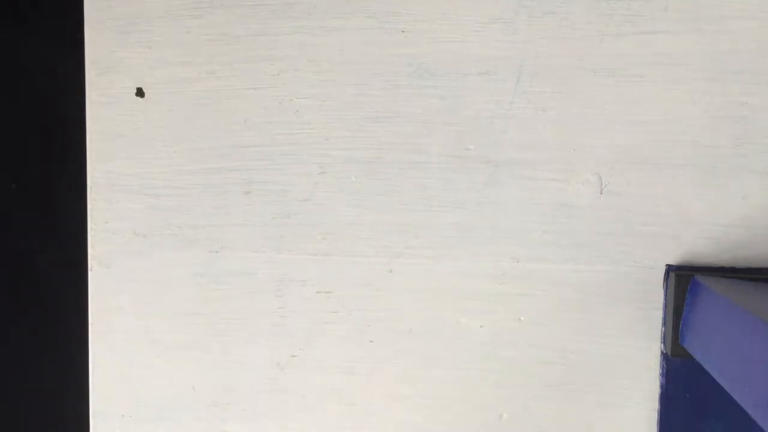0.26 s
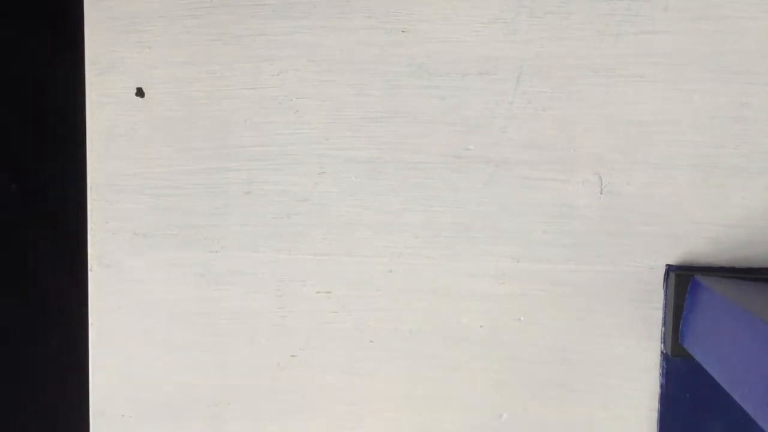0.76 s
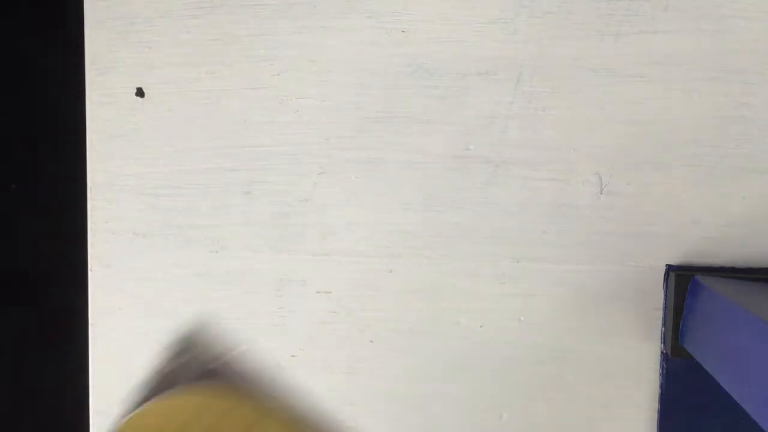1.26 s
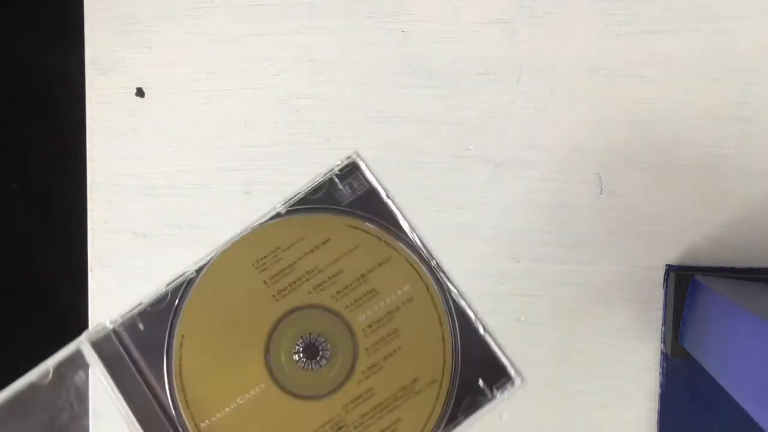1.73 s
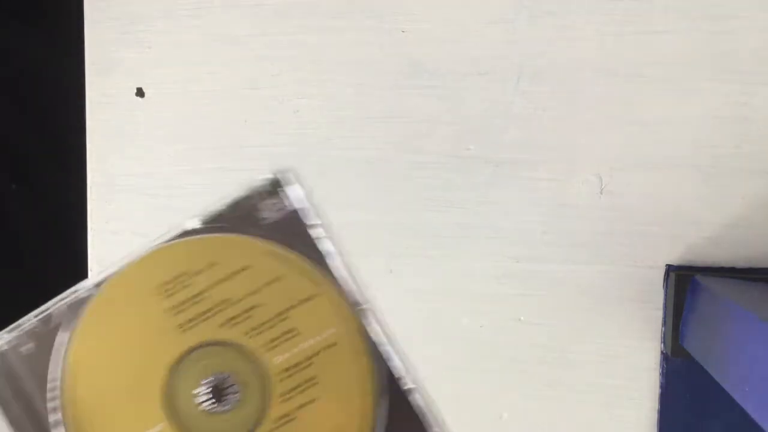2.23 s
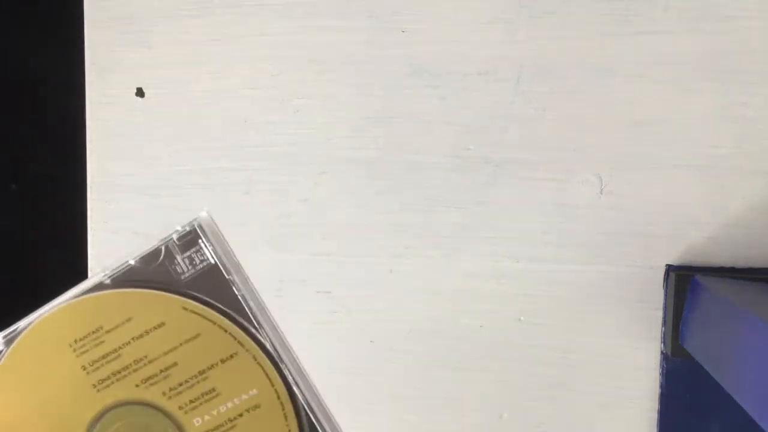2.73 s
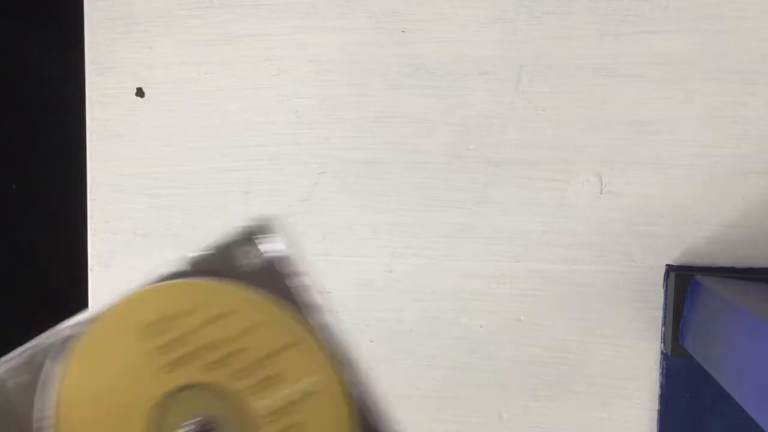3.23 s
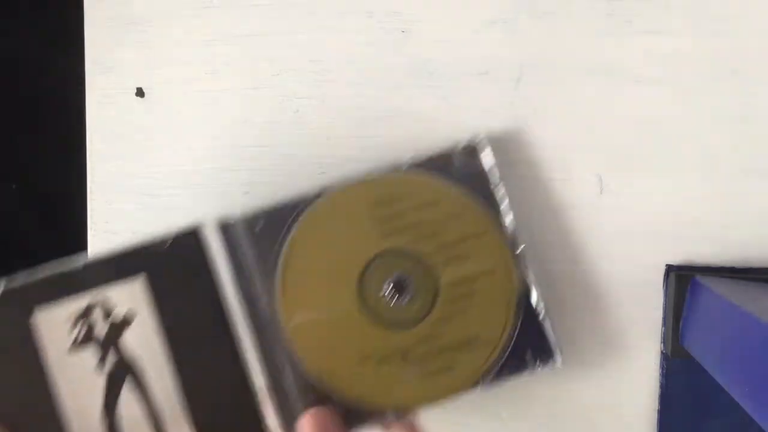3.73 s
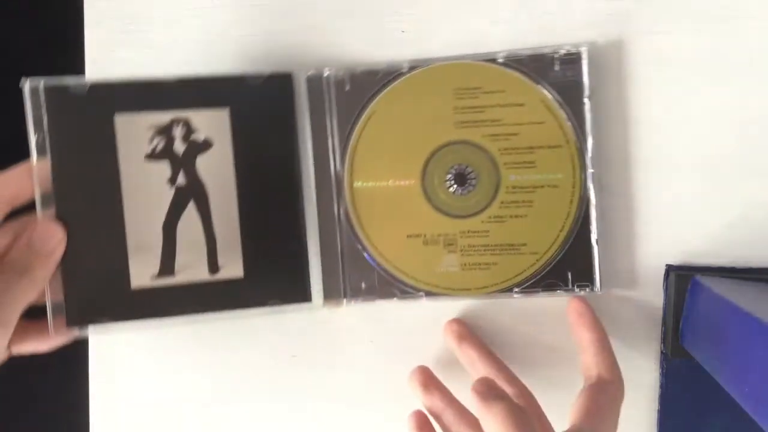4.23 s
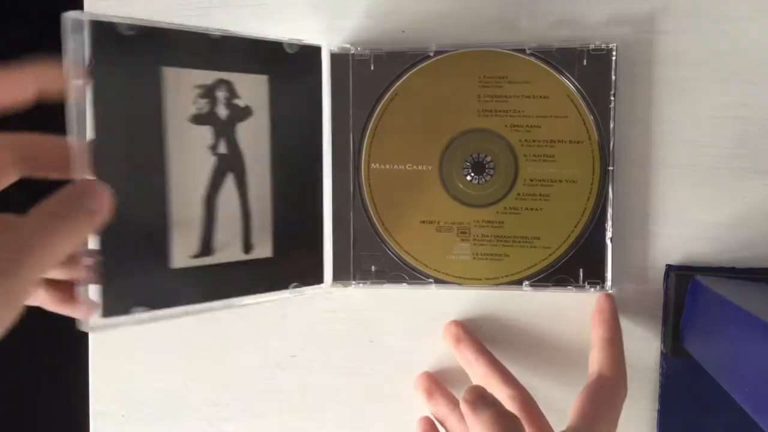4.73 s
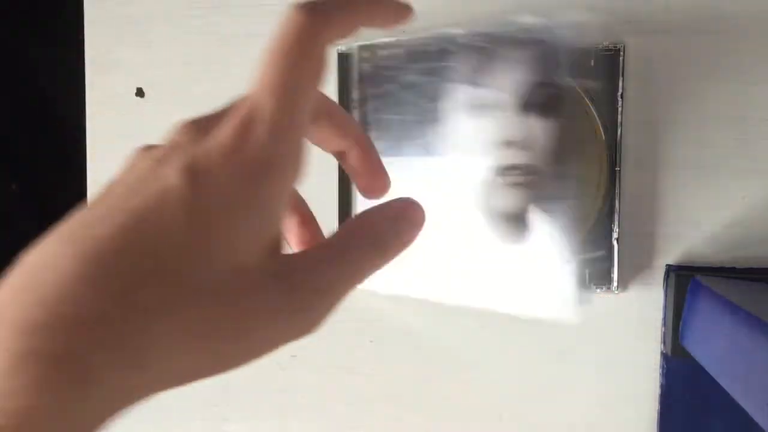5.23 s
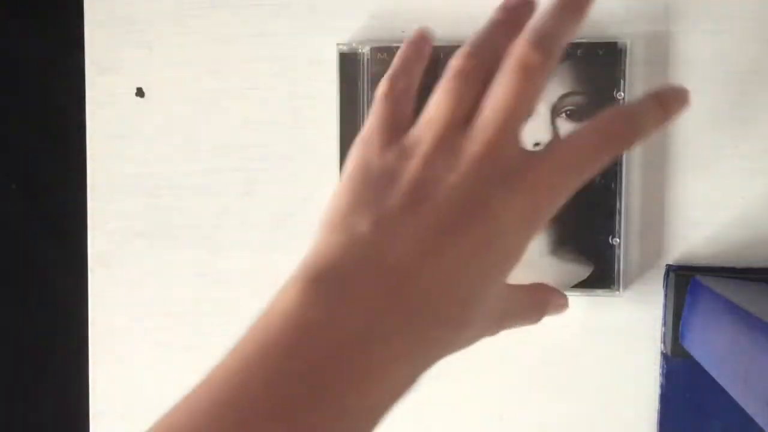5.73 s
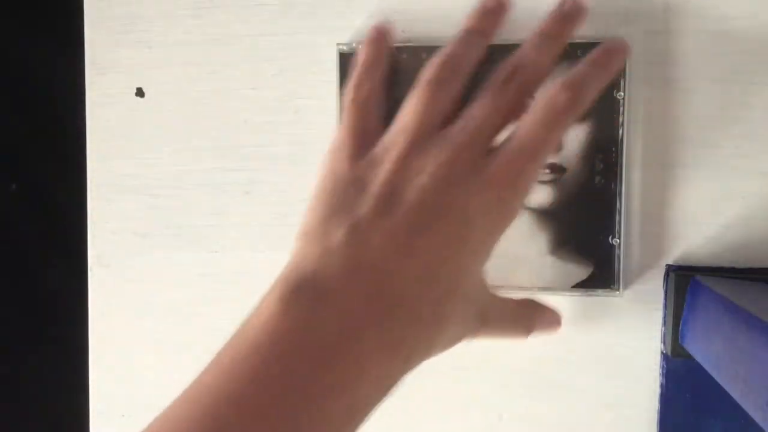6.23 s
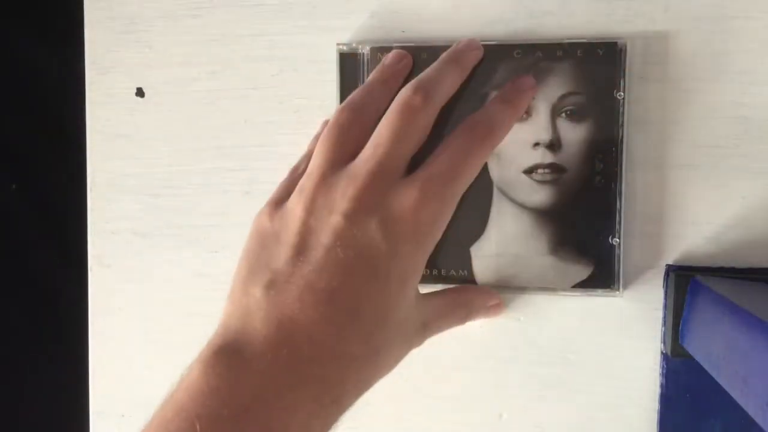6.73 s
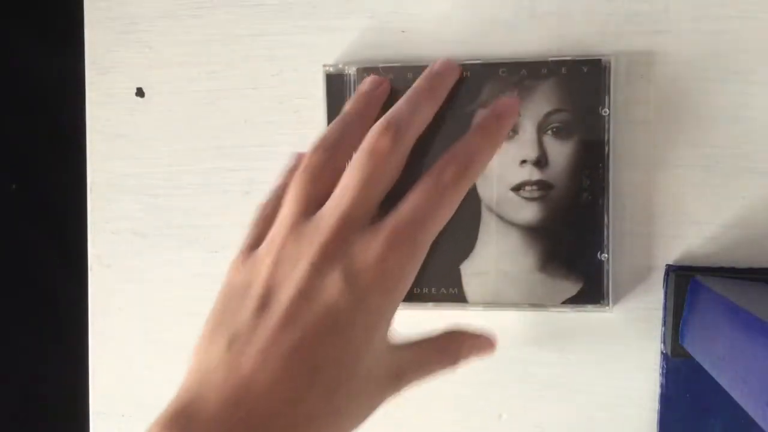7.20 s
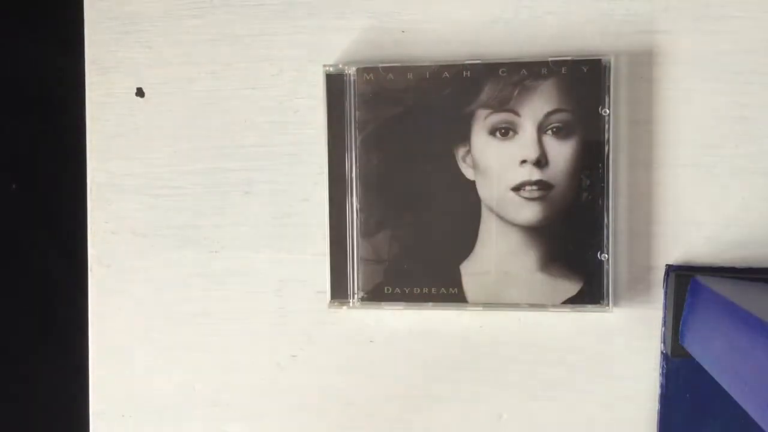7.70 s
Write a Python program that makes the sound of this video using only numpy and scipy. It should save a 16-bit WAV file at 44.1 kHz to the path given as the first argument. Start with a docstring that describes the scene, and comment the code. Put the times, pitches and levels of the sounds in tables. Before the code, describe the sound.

Bright, brittle plastic ticks come in uneven bursts, with short rustling strokes of paper and fingers. A hard case lands on a table with a clatter and scrapes, then pauses before a crisp sharp snap closes it. Only faint touches remain. Behind it, through the walls, a low engine note climbs and falls in traffic rumble, and a soft low hum ends it. Close microphone, light hiss, short room tail.

```python
"""Handling a plastic disc case

Hands turn an open case, slide its paper booklet in, set it down on a table, push it along and snap it shut.
Knocks (short forces) and rubbing (strings of micro-contacts) excite the same case and table modes in a small room.
Outside, an engine revs as a harmonic series amid traffic, which is shaped noise; a low steady tone follows
near the end. A faint whistle of narrow-band noise and the microphone's hiss complete the scene."""
import sys
import numpy as np
from scipy import signal
from scipy.io import wavfile

SR = 44100
rng = np.random.default_rng(int(sys.argv[2]) if len(sys.argv) > 2 else 0)


def inscribe(sig):
    """Save sig as 16-bit PCM at rate SR to the path in sys.argv[1].

    A 1-D sig is mono; a 2-D sig holds one channel per row.
    Samples are clipped to [-1, 1] before scaling.
    """
    pcm = np.round(np.clip(np.atleast_2d(sig).T, -1, 1) * 32767)
    wavfile.write(sys.argv[1], SR, pcm.astype(np.int16))


N = 351036

LANDS_S, LAID_DOWN_S, SHUT_S = 3.7, 4.08, 5.3   # the case meets the table, lies flat, is shut
IN_HAND_HZ, ON_TABLE_HZ = 1000, 1400   # the lowest free case mode rises once the case lies flat
TABLE, LOWER, MIDDLE, UPPER = range(4)   # registers of the body


def amp(db):
    """Decibel law: 20 dB is a factor of ten in amplitude."""
    return 10 ** (np.asarray(db) / 20)


def rms_one(x):
    """Normalisation to unit root-mean-square."""
    return x / np.sqrt(np.mean(x ** 2) + 1e-20)


def in_time(rows):
    """Linear interpolation of each column along the time in the first."""
    s, *columns = np.transpose(rows)
    return [np.interp(np.arange(N) / SR, s, column) for column in columns]


def while_on(rows, fade_s=0.55):
    """Linear gating: fades centred on the first and last rows."""
    t = np.arange(N) / SR
    return np.clip(np.minimum(t - rows[0][0], rows[-1][0] - t) / fade_s + .5, 0, 1)


def drift(rate_hz):
    """Low-passed chance, two poles at the given rate; spread 1."""
    r = np.exp(-80 * np.pi * rate_hz / SR)   # one value per 40 samples
    slow = signal.lfilter([1], [1, -2 * r, r * r], rng.standard_normal(N // 40 + 2002))[2000:]
    return np.interp(np.arange(N) / 40, np.arange(len(slow)), rms_one(slow))


def resonate(x, hz, width_hz):
    """Damped resonance of one mode; white noise of rms 1 comes out at rms 1."""
    r = np.exp(-np.pi * width_hz / SR)
    b = np.sqrt((1 - r * r) / 2)
    return signal.lfilter([b, 0, -b], [1, -2 * r * np.cos(2 * np.pi * hz / SR), r * r], x)


def band(x, low_hz, high_hz):
    """Band-pass filtering; white noise of rms 1 comes out near rms 1."""
    sos = signal.butter(2, [low_hz, high_hz], "band", fs=SR, output="sos")
    return signal.sosfilt(sos, x) * np.sqrt(SR / 2 / (high_hz - low_hz))


def coloured(spectrum, patchy_db):
    """Spectral shaping by bands of about half an octave, each flickering a little; rms 1."""
    hz, level_db = np.transpose(spectrum)
    out, white = 0, rng.standard_normal((2, N))
    edges = np.geomspace(hz[0], hz[-1], int(2.5 * np.log2(hz[-1] / hz[0])))
    for k, (low, high) in enumerate(zip(edges, edges[1:])):
        per_hz_db = np.interp(np.log(low * high) / 2, np.log(hz), level_db)
        level = amp(per_hz_db + patchy_db * drift(5.7)) * np.sqrt(high - low)
        out = out + level * band(white[k % 2], low, high)
    return rms_one(out)


# modes of the table (below 600 Hz) and the case: mode_hz, width_hz, open_db, shut_db (relative levels)
MODES_OF_CASE = [(160, 39, -3, 2.5), (253, 37, 3.5, -3.5), (287.6, 31, 5.5, 2), (402, 32, -3.5, -7),
                 (1004, 80, -2.5, -8), (1220, 80, -7, -2.5), (1355, 76, -2, 1), (1752, 200, 3.5, -4),
                 (1920, 100, -0.5, -1), (2110, 100, 1, 4), (2454, 140, 1, -4), (2737, 120, -6.5, 2),
                 (2925, 90, -5.5, 0), (3170, 90, -5, -6), (3500, 120, 3.5, -0.5), (4363, 160, 3.5, -0.5),
                 (5050, 280, -5.5, 0), (5700, 750, 0.5, 0.5), (6540, 530, -2, 0.5), (6930, 220, -5.5, -1),
                 (8270, 300, -2, 1.5)]
# registers of the body: low_hz, high_hz, broad_db (relative level of the sound between the modes)
REGISTERS = [(110.8, 410, -4), (633, 1850, -3.5), (1753.3, 5200, -2.5), (5040, 12000, 0.5)]
RUB_BETWEEN_MODES_DB = -5   # rubbing speaks mostly through the modes


def case():
    """Modal superposition: knocks and friction drive each mode with a strength of its own."""
    rub_levels, free_hz = rubbing()
    flat = np.arange(N) / SR >= LAID_DOWN_S
    shut = np.arange(N) / SR >= SHUT_S
    lowest_hz = np.where(flat, ON_TABLE_HZ, IN_HAND_HZ)
    friction, rattle = grit(2500, spread_db=3), grit(4000, spread_db=3)
    out, n = np.zeros(N), 0
    for k, (low, high, broad_db) in enumerate(REGISTERS):
        modes = [m for m in MODES_OF_CASE if low <= m[0] < high]
        register = 0
        for mode in modes + [None]:   # None is the broad sound between the modes
            force, chatter = knocks(k, mode, lowest_hz)
            if not mode:
                force = force * np.roll(rattle, 997 * n)

            if mode and k in (LOWER, MIDDLE):
                free = lowest_hz if k == LOWER else free_hz
                rub_db = grip(mode[0], free, 7 + 3 * flat - 5 * shut, flat)
            else:
                rub_db = 2 * shut
            flicker_db = 3.5 * drift(28) + (0 if mode else RUB_BETWEEN_MODES_DB)
            rub = rub_levels[k] * amp(flicker_db + rub_db)

            # shifted copies keep the grit of each mode its own
            push = force + (rub + chatter) * np.roll(friction, 1499 * n)
            if mode:
                mode_hz, width_hz, open_db, shut_db = mode
                push = push * amp(np.where(shut, shut_db, open_db))
                register += resonate(push, mode_hz, width_hz) / np.sqrt(len(modes))
            else:
                register += amp(broad_db) * band(push, low, high)
            n += 1
        sos = signal.butter(2, [low / 1.2, high * 1.2], "band", fs=SR, output="sos")
        out += signal.sosfilt(sos, register)
    return out


# knocks, ticks and the snap: start_s, level_db (1.8-5 kHz), then relative to it thump_db (table),
# lower_db (0.7-1.8 kHz), upper_db (above 5 kHz); contact_ms, free_hz (the freest-ringing pitch)
KNOCKS = [(0.071, -45.5, -31, -16, -7, 2.5, 3937), (0.429, -47, -7, -38, -1.5, 2.6, 2720),
          (0.486, -35.5, -5.5, -3, -7, 3.57, 4950), (0.856, -57, -20, -5, -1, 3.3, 2520),
          (0.969, -45.5, -13, -4, -2, 3, 2530), (1.0206, -36, -44, -37, -8.5, 1.9, 3080),
          (1.087, -41.5, -32, -31, 3.5, 4, 2860), (1.126, -39, -16, -7.5, -4.5, 11.2, 4750),
          (1.184, -43, -26, -11, -9.5, 10, 1760), (1.714, -57, -25, -24, 5.5, 9.9, 3800),
          (1.756, -59, -21, -18, 8, 19, 4520), (1.931, -44, -5, 0, -20, 6.1, 1910),
          (1.94, -30, -10.5, -11.5, -5.5, 7.3, 4220), (2.084, -33.5, -5, -5, -8, 3.26, 3990),
          (2.0918, -25, -8.5, -8.5, -9, 3.6, 4330), (2.096, -40.5, -22, 13.5, -24, 5.45, 1920),
          (2.026, -52, -25, -20, -8, 4, 4600), (2.286, -52, -16, 0, -11, 5, 3430),
          (2.557, -55, -18, 8, -10, 3, 1000), (2.704, -35.5, -26, -22, -7.5, 6, 2230),
          (2.717, -50.5, -2, 4, 2, 5.1, 2200), (2.802, -44.5, -10, 13, 9.5, 1.2, 1240),
          (2.969, -46.5, -23, -13, -6, 5, 3630), (3.028, -44, -12.5, -3.5, -22, 8.6, 3350),
          (3.048, -50, -11, 3, -20, 3.1, 3500), (3.464, -45, -21, -13, -18, 3.8, 4200),
          (3.495, -42.5, -26, 3, -36, 2.93, 1950), (3.711, -22, -9.5, -3, -11.5, 4.37, 3800),
          (3.786, -34, -7.5, -3, -14, 3.4, 2770), (4.044, -22.5, -8.5, -2, -6, 2.5, 2000),
          (4.058, -14.5, -12, -6, -10.5, 5.53, 2531), (4.063, -19.5, -5.5, -9, -14, 3.97, 3450),
          (4.987, -53.5, 10, -1, -32, 14, 2130), (5.335, -23, -13.5, -10.5, -8, 5, 2166),
          (5.3396, -11, -16.5, -12.5, 0, 7.04, 2110), (5.347, -18.5, -5, 1.5, -2.5, 5, 2804),
          (5.928, -56, 7.5, 3, -19, 7.6, 2075), (6.196, -59.5, -2, 7.5, -9.5, 4.3, 2184),
          (6.251, -56.5, -9, -16, -22, 6.8, 2150), (6.464, -51.5, -6, -5, -3.5, 3.7, 3050),
          (6.474, -54, 6, 1, -14, 3, 1220), (6.52, -57.5, 6, 11, -18, 3.2, 1002),
          (6.939, -51, -2, 1.5, -9, 4.1, 4510), (7.151, -52, -2, 5, -13.5, 2.58, 2160)]
RATTLE_MS, RATTLE_DB = 8.8, -14   # decay constant; level after a knock of -40 dB
THUD_IN_HAND_HZ, THUD_ON_TABLE_HZ = 180, 300   # the low thud rises once the case meets the table


def knocks(k, mode, lowest_hz):
    """Impulsive excitation: the forces on one mode, and the chatter of loose parts after each."""
    force, loose = np.zeros((2, N + SR))
    decay = amp(RATTLE_DB) * np.exp(-np.arange(SR // 20) / SR * 1000 / RATTLE_MS)
    for s, mid, thump, lower, upper, ms, free in KNOCKS:
        start = at = round(s * SR)
        shape = contact(ms)
        if mode:   # a mode takes the whole blow at one moment; the table answers late in the contact
            share = rng.uniform(.15, 1) if k != TABLE else .8
            shape = np.sqrt([np.sum(shape ** 2)])
            at = start + round(share * ms * SR / 1000)

        grip_db = 0
        if k == TABLE and mode:
            grip_db = grip(mode[0], THUD_IN_HAND_HZ if s < LANDS_S else THUD_ON_TABLE_HZ, 5)
        elif k in (LOWER, MIDDLE) and mode:   # a hard blow overcomes the grip and rings every mode
            ringing_hz = lowest_hz[at] if k == LOWER and free >= ON_TABLE_HZ else free
            grip_db = grip(mode[0], ringing_hz, -.2 * mid / (3 - k))
        elif k in (LOWER, MIDDLE):   # a light tick is mostly ring, a hard blow mostly clatter
            grip_db = .3 * mid + 6

        relative_db = [thump, lower, 0, upper][k]
        strength = amp(mid + relative_db + grip_db + 4 + 1.5 * rng.standard_normal())
        force[at:at + len(shape)] += shape * strength
        # light knocks chatter most for their strength
        loose[start:start + len(decay)] += decay * strength * amp(-.15 * (mid + 40))
    return force[:N], loose[:N]


def contact(ms):
    """Contact mechanics: the force builds as edges meet, then dies away."""
    t_ms = np.arange(int(.04 * SR)) / SR * 1000
    return (1 - np.exp(-t_ms / (0.47 * ms))) * np.exp(-(t_ms / ms) ** 2)


PARTNER_RATIO = 2.2   # lying flat, a free mode also frees a partner this far below it


def grip(hz, free_hz, depth_db, flat=0):
    """Selective damping: touch favours modes near the free pitch over the others."""
    free, partner = (np.exp(-(np.log2(hz * ratio / free_hz) / .21) ** 2) for ratio in (1, PARTNER_RATIO))
    return depth_db * (free + .8 * flat * partner - .5)


# strokes of fingers, paper and case: start_s, length_s, level_db (1.8-5 kHz), change_db (over the stroke),
# lower_db (0.7-1.8 kHz) and upper_db (above 5 kHz) relative to level_db, free_hz (the freest-ringing pitch)
STROKES = [(0.0, 0.59, -71, 1, -2, 2, 2390), (0.172, 0.066, -69.5, -1.5, -17, 8.5, 3800),
           (0.373, 0.023, -66, 3.5, 3.5, -4, 2100), (0.99, 1, -72, 5.5, -11, 1.5, 3040),
           (1.14, 0.071, -53.5, -12.5, -3.5, -1, 2520), (1.272, 0.064, -60.5, 0, -7, -1, 1730),
           (1.463, 0.055, -54, 0, -3, 2, 3500), (1.768, 0.029, -63, -6, -15, 6, 3320),
           (1.896, 0.016, -57, -7, -20, -6, 2300), (2.04, 0.026, -50, 2.5, -13, 3.5, 4220),
           (2.293, 0.13, -47, -6, -2.5, 1.5, 3400), (2.425, 0.13, -56.5, 8, -2, 3.5, 3900),
           (2.564, 0.13, -50.5, -13.5, -8, 4, 3870), (2.796, 0.15, -50.5, -12, -8, -1, 3660),
           (3.715, 0.18, -38.5, -9, -7.5, -5, 3470), (3.881, 0.3, -40, -9, -12, -4.5, 3520),
           (4.093, 0.25, -39.5, -10, -2.5, -7.5, 3200), (4.268, 0.26, -46.5, -9, -3.5, -8, 4290),
           (4.564, 0.83, -71.5, 3.5, -1, -7, 4850), (4.709, 0.034, -55.5, 4.5, -5, -10, 4500),
           (5.2, 0.055, -59.5, -1, 5.5, -9, 1889), (5.28, 0.049, -57, 6.5, 2.5, -7, 1930),
           (6.835, 0.028, -51, -5.5, -1, -10, 1940), (6.88, 0.047, -53, -2.5, 1, -9, 3300),
           (6.941, 0.041, -52.5, -8, -1.5, -11, 2100), (7.284, 0.19, -72.5, 1, -8, -9.5, 3000)]
PRESS_DB_PER_S, LIFT_DB_PER_S = 447, 348   # swell before the start for a -55 dB stroke; fall after the end


def rubbing():
    """Stick-slip friction: strokes set the rub level of each register and the free pitch."""
    t = np.arange(0, N, 64) / SR
    start, length, level, change, *colour = np.array(STROKES).T[:, :, None]
    run_db = level + change * np.clip((t - start) / length, 0, 1)
    press = PRESS_DB_PER_S * amp(0.35 * (level + 55))   # firmer strokes swell faster
    stroke_db = run_db - press * np.maximum(start - t, 0) - LIFT_DB_PER_S * np.maximum(t - start - length, 0)
    strongest = stroke_db.argmax(axis=0)   # the strongest stroke sets level and colour
    courses = [stroke_db.max(axis=0)] + [c[strongest, 0] for c in colour]
    mid_db, lower_db, upper_db, free_hz = [np.interp(np.arange(N) / SR, t, c) for c in courses]

    rasp_db = 1.8 * drift(40)   # the surfaces catch and let go
    table_db = lower_db - 7 - 5 * (np.arange(N) < LANDS_S * SR)   # the table hums along more once touched
    levels = amp(mid_db + rasp_db + [table_db, lower_db, 0 * mid_db, upper_db])
    levels[TABLE] += hinge()
    return levels, free_hz * 2 ** (.07 * drift(9))   # the grip keeps shifting


# groan of the swinging lid: start_s, level_db
HINGE = [(4.55, -63), (4.95, -65), (5.15, -50), (5.22, -52), (5.33, -62.5)]


def hinge():
    """Structure-borne friction: the level at which the swinging lid groans into the table."""
    return while_on(HINGE) * amp(in_time(HINGE)[0] + 2.5 * drift(15))


def grit(per_s, spread_db):
    """Poisson-like excitation: random micro-contacts of uneven size; rms 1."""
    sizes = amp(spread_db * np.minimum(rng.exponential(1, N), 4)) * rng.choice([-1, 1], N)
    return rms_one(sizes * (rng.random(N) < per_s / SR))


ROOM_T60_S, ROOM_DB, WALL_CUT_HZ = .135, -13, 13000


def room(x):
    """Diffuse reverberation: a dense tail of decaying noise after the first reflection."""
    t = np.arange(int(.4 * SR)) / SR
    tail = rng.standard_normal(len(t)) * amp(-60 * t / ROOM_T60_S) * (t > .004)
    tail = signal.sosfilt(signal.butter(1, WALL_CUT_HZ, fs=SR, output="sos"), tail)
    return amp(ROOM_DB) * signal.fftconvolve(x, tail / np.sqrt(np.sum(tail ** 2)))[:N]


# engine outside, speeding up, then easing off: start_s, firing_hz, level_db
ENGINE = [(.7, 47.67, -66), (1.55, 55.3, -63.5), (2.0, 60, -67), (2.5, 64.4, -67.5), (3.5, 75.36, -56),
          (3.95, 77.7, -43.5), (4.65, 81.85, -53.5), (5.1, 80.8, -49.5), (5.5, 80.3, -52.5),
          (5.8, 73.45, -51.5), (6.3, 64.7, -77)]
# relative level_db of orders 1, 2, 3 with the throttle open
PULLING_DB = [-14.5, -3, -13]
# relative level_db of orders 1, 2, 3 with the throttle shut
COASTING_DB = [3.5, -15.5, -18.5]
THROTTLE_SHUT_S, THROTTLE_TAKES_S = 5.33, 0.05   # middle of the closing, and how long it takes


def engine():
    """Harmonic orders: the second leads while it pulls, the first once the throttle shuts."""
    shut = np.clip((np.arange(N) / SR - THROTTLE_SHUT_S) / THROTTLE_TAKES_S + .5, 0, 1)
    orders_db = [a + (b - a) * shut for a, b in zip(PULLING_DB, COASTING_DB)]
    return tones(ENGINE, orders_db, waver_db=2.0)


# low steady tone near the end: start_s, pitch_hz, level_db
HUM = [(6.75, 88.1, -59.5), (7.96, 88.2, -55.5)]


def hum():
    """Pure tone: a single sine wavering slightly in level."""
    return tones(HUM, [0], waver_db=1.5)


BOOM_HZ, BOOM_OCTAVES, BOOM_DB = 161, 0.29, 9   # the room booms when an order passes this pitch


def tones(rows, orders_db, waver_db):
    """Harmonic series: multiples of a gliding pitch, each wavering, lifted near the boom."""
    hz, level_db = in_time(rows)
    turn, out = 2 * np.pi * np.cumsum(hz) / SR, 0
    for order, order_db in enumerate(orders_db, 1):
        boom_db = BOOM_DB * np.exp(-(np.log2(order * hz / BOOM_HZ) / BOOM_OCTAVES) ** 2)
        level = amp(level_db + order_db + boom_db + waver_db * drift(4.6))
        out = out + level * np.sin(order * turn)
    return while_on(rows) * np.sqrt(2) * out


# traffic: start_s, rumble_db, tyre_db, tyre_hz (centre of the tyre hiss)
TRAFFIC = [(0, -62.5, -100, 910), (1.5, -55, -98, 900), (2.2, -61, -75, 887), (3.1, -62.5, -67, 754.4),
           (3.8, -48.5, -99, 693), (4.7, -54, -65.5, 662), (5.15, -53, -68, 618.6),
           (5.45, -52.5, -69, 1005), (6.72, -57, -76, 1080), (7.96, -60.5, -88, 1060)]
# rumble spectrum: pitch_hz, level_db (relative, per Hz)
RUMBLE = [(28, -51), (45, -20), (90, -4.5), (230, -15), (350, -24.5), (500, -31.5), (900, -42.5)]
TYRE_WIDTH_HZ = 120


def traffic():
    """Broadband noise: low rumble through the walls and a moving band of tyre hiss."""
    rumble_db, tyre_db, tyre_hz = in_time(TRAFFIC)
    sos = signal.butter(2, TYRE_WIDTH_HZ / 2, fs=SR, output="sos")
    slow = signal.sosfilt(sos, rng.standard_normal((2, N)))
    turn = 2 * np.pi * np.cumsum(tyre_hz) / SR
    tyres = rms_one(slow[0] * np.cos(turn) + slow[1] * np.sin(turn))   # slow noise shifted up to tyre_hz
    return amp(rumble_db) * coloured(RUMBLE, patchy_db=3.0) + amp(tyre_db) * tyres


# faint thin whistle: start_s, level_db
WHISTLE = [(3.19, -74), (3.4, -82)]
WHISTLE_HZ = 2720


def whistle():
    """Narrow-band noise: white noise sent twice through one sharp resonance."""
    thin = resonate(resonate(rng.standard_normal(N), WHISTLE_HZ, 40), WHISTLE_HZ, 40)
    return while_on(WHISTLE, fade_s=.04) * amp(in_time(WHISTLE)[0]) * rms_one(thin)


# microphone hiss spectrum: pitch_hz, level_db (relative, per Hz)
HISS = [(500, -2.5), (1400, -6), (2740, -6), (6500, -9), (8900, -8.5), (11500, -10), (13600, -14.5)]
HISS_DB = -66.5


def hiss():
    """Stationary self-noise of the microphone, shaped in bands."""
    return amp(HISS_DB) * coloured(HISS, patchy_db=0.97)


def scene():
    """Superposition: only the near sound excites the room's tail."""
    near = case()
    far = engine() + hum() + traffic() + whistle()
    return (near + room(near) + far + hiss())[None]


TREBLE_TOP_HZ, CUTOFF_HZ = 11400, 16400   # corner of the treble roll-off; 70 dB down from the cutoff up


def record(dry):
    """Band-limiting and soft saturation: the treble rolls off, peaks are rounded, the top is cut."""
    heard = signal.sosfilt(signal.butter(4, TREBLE_TOP_HZ, fs=SR, output="sos"), dry)
    rounded = .95 * np.tanh(heard / 1.05)
    return signal.sosfilt(signal.cheby2(12, 70, CUTOFF_HZ, fs=SR, output="sos"), rounded)


dry = scene()
out = record(dry)
inscribe(out)
```